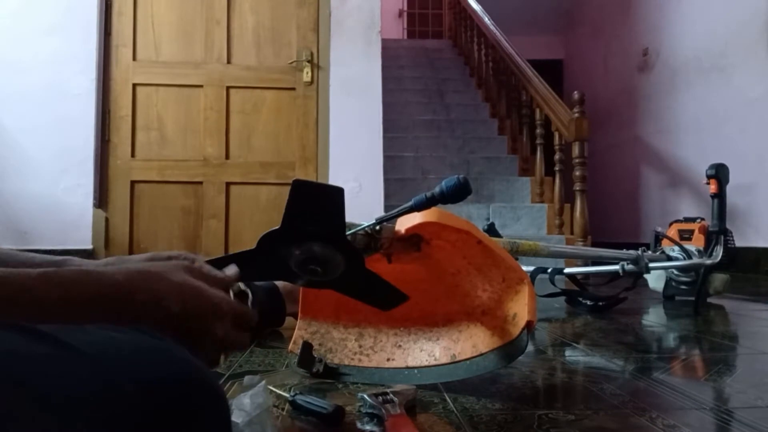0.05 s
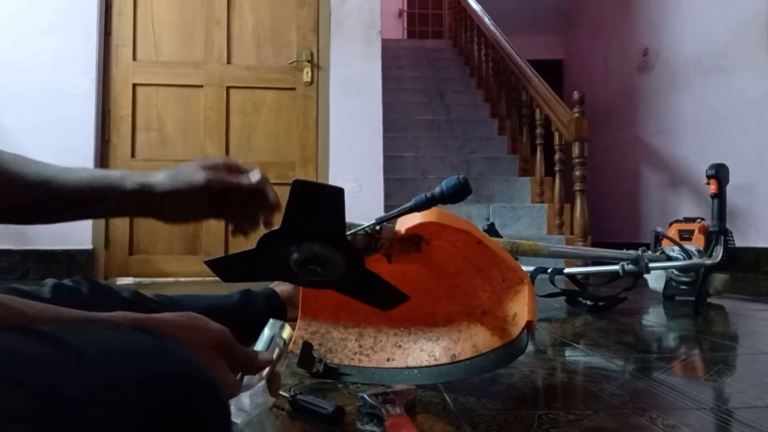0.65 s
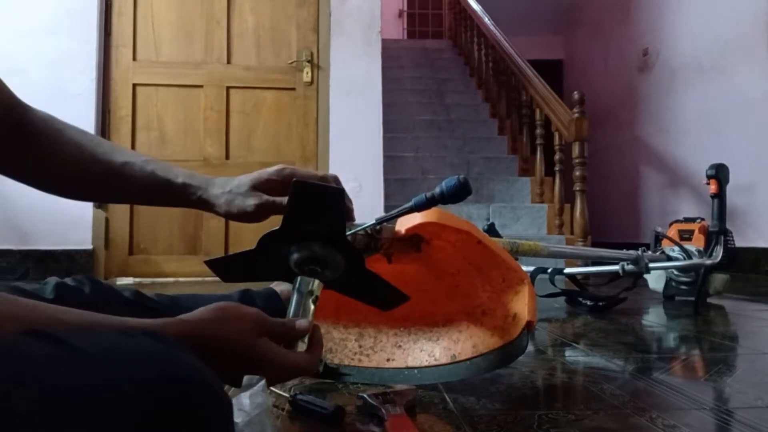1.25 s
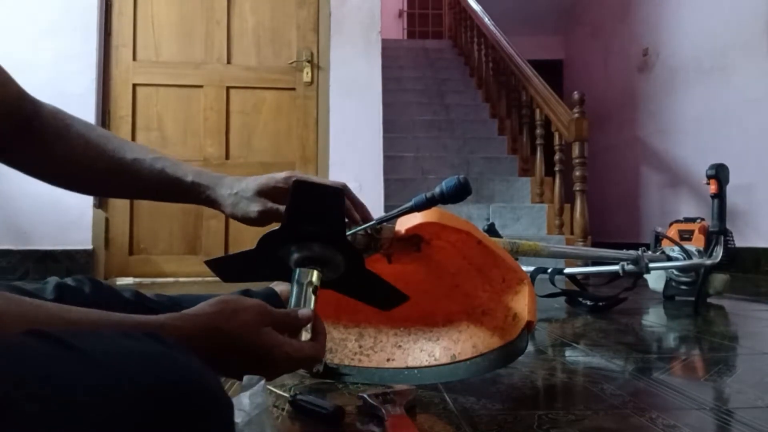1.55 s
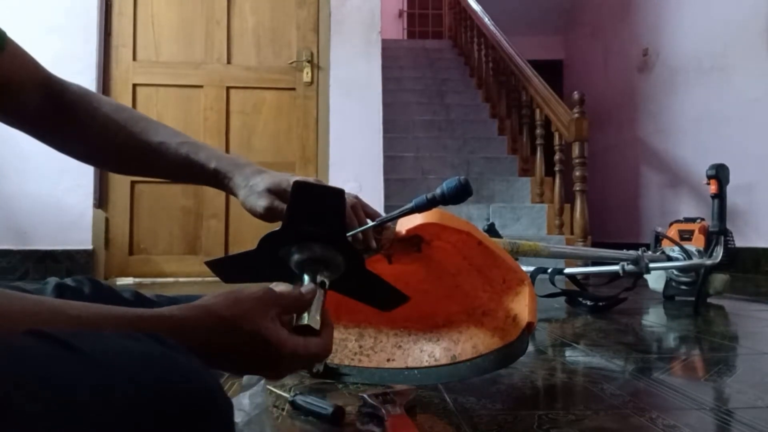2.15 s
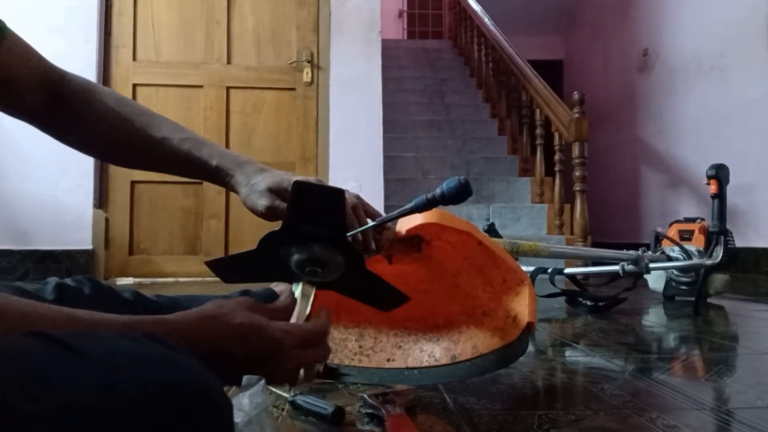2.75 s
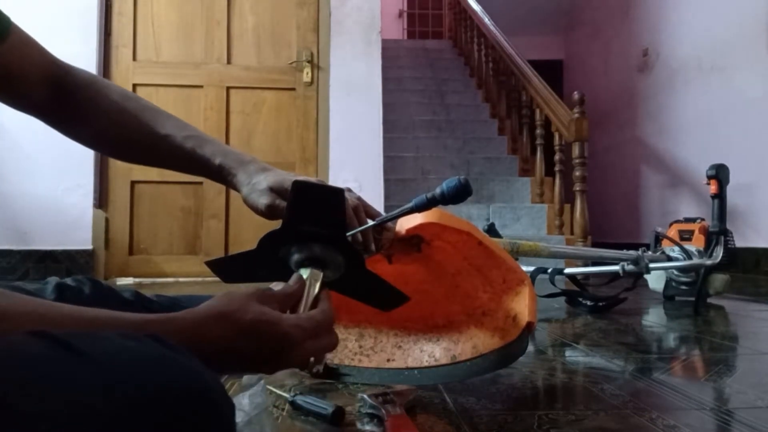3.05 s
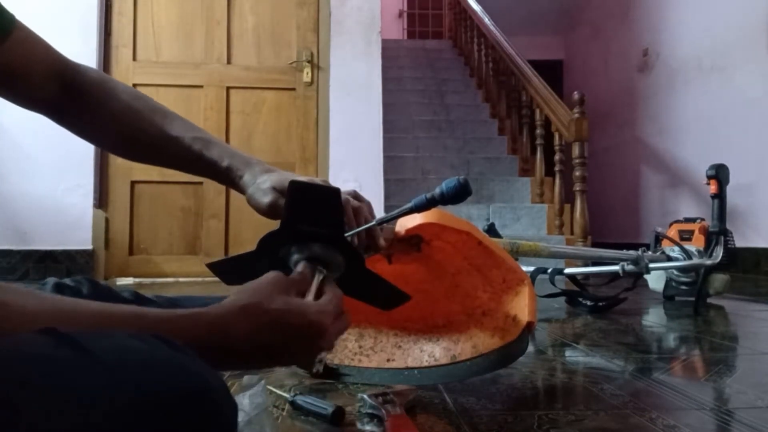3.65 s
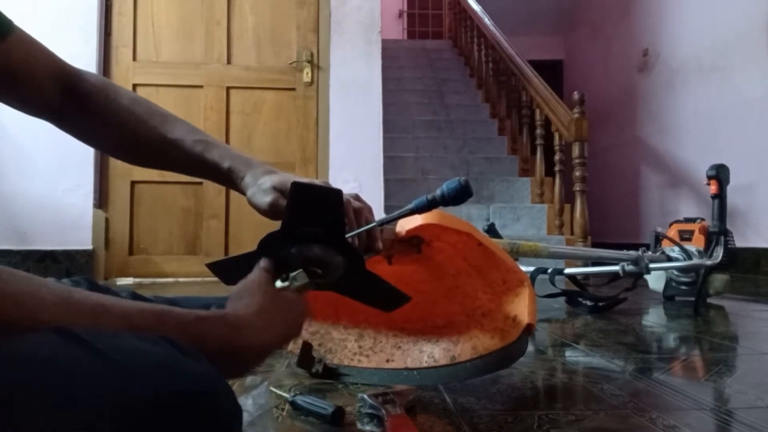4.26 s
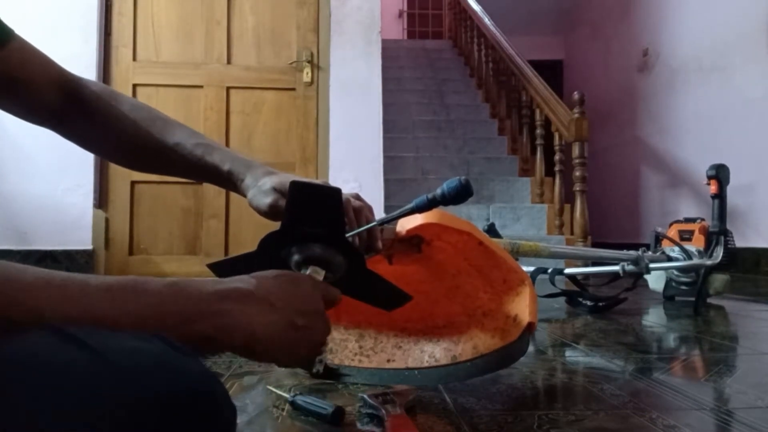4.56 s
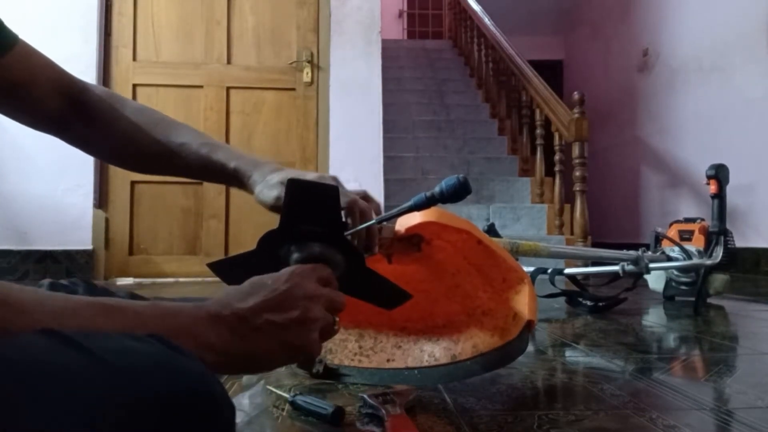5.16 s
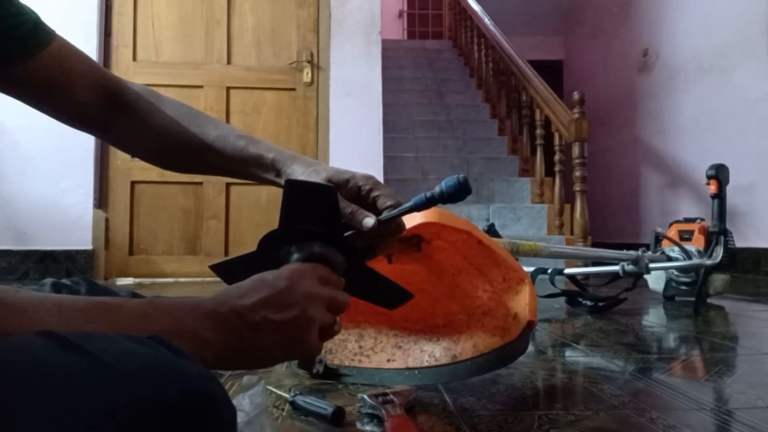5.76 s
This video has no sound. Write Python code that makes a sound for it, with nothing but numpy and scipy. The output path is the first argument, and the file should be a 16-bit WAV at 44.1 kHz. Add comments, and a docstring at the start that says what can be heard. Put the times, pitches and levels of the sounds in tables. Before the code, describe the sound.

A steel box spanner works loose the hub nut of a brush cutter. After a quiet opening, it clinks against the nut in short, irregular clusters. Sharper clanks follow, with the blade and washer ringing briefly, along with low thumps as the machine rocks and a few short, dull rubs of the thread. The strongest clank comes near the end. The sounds are nearby, in an echoing tiled hall with a faint hush and a barely audible cricket.

```python
"""Loosening a brush cutter's hub nut

A steel box spanner works the nut loose. Each impact sets spanner, nut, cup washer or blade ringing in its
natural modes and rattles the gear head and guard. The thread rubs by stick-slip friction, and the machine
rocks with low thumps. A hard tiled hall reverberates; a cricket chirps faintly over a steady hush."""
import sys
import numpy as np
from scipy import signal
from scipy.fft import rfft, irfft, next_fast_len
from scipy.io import wavfile

SR = 44100
rng = np.random.default_rng(int(sys.argv[2]) if len(sys.argv) > 2 else 0)


def transcribe(u):
    """Save the signal u as a 16-bit wav file named by the first command-line argument.

    u: samples, shape (n,) or (channels, n), limited to [-1, 1]; the rate is SR.
    q: integer samples, one column per channel.
    """
    v = np.clip(np.atleast_2d(u).T, -1, 1)
    q = np.round(v * 32767).astype(np.int16)
    wavfile.write(sys.argv[1], SR, q)


N = 256662


def amp(db):
    """Amplitude ratio: tenfold for every 20 dB."""
    return 10 ** (np.asarray(db) / 20)


def unit(x):
    """Normalisation to an rms of 1."""
    return x / np.sqrt(np.mean(x ** 2) + 1e-20)


def along(points, hz):
    """Interpolation of (frequency_hz, value) points on a logarithmic frequency axis."""
    knots_hz, values = np.transpose(points)
    return np.interp(np.log(hz + 1), np.log(knots_hz + 1), values)


def coloured(x, colour_db):
    """Minimum-phase filtering: folding the cepstrum makes the gain curve colour_db(hz) causal."""
    size = 2 * next_fast_len(x.shape[-1] // 2 + 4096)
    gain = amp(colour_db(np.fft.rfftfreq(size, 1 / SR)))
    cepstrum = irfft(np.log(gain), size)
    cepstrum[..., 1:size // 2] *= 2
    cepstrum[..., size // 2 + 1:] = 0
    return irfft(rfft(x, size) * np.exp(rfft(cepstrum)), size)[..., :x.shape[-1]]


def spread(pair, width):
    """Mid-side stereo: two unrelated signals share the power as the (frequency_hz, side_db) points say."""
    def share_db(hz):
        side_db = along(width, hz)
        return np.array([0 * hz, side_db]) - 10 * np.log10(1 + amp(side_db) ** 2)
    mid, side = coloured(pair, share_db)
    return np.array([mid + side, mid - side])


def band(x, lo_hz, hi_hz, order=4):
    """Causal band-pass filtering."""
    return signal.sosfilt(signal.butter(order, [lo_hz, hi_hz], "band", fs=SR, output="sos"), x)


def add(track, x, start_s):
    """Superposition: x is summed into the track from start_s on."""
    span = track[:, round(start_s * SR):][:, :x.shape[1]]
    span += x[:, :span.shape[1]]


# Spectral density of the hush: frequency_hz, relative_db
AIR_SPECTRUM = [(25, -9), (130, 3), (300, -1), (1000, -3), (2000, -1.5), (2700, -6.5), (3500, -14.5),
                (9000, -17.5), (15000, -23)]
# Stereo width of the hush: frequency_hz, side_db
AIR_WIDTH = [(40, -8), (250, -5.5), (1200, 1.5), (8000, 0)]


def air(level_db=-70.5):
    """Stationary noise: the steady hush of the building, strongest in the bass."""
    hush = coloured(rng.standard_normal((2, N)), lambda hz: along(AIR_SPECTRUM, hz))
    return amp(level_db) * unit(spread(hush, AIR_WIDTH))


def cricket(chirps_per_s=8.8, first_s=.06, pitch_hz=7000, width_hz=260, left_db=-84, right_gain_db=-9):
    """Amplitude modulation: distant chirps, smeared by the walls into a narrow pulsing band of noise."""
    t = np.arange(N) / SR
    chirps = 0.29 + np.cos(np.pi * chirps_per_s * (t - first_s)) ** 2
    song = band(rng.standard_normal((2, N)), pitch_hz - width_hz / 2, pitch_hz + width_hz / 2, order=2)
    return amp([[left_db], [left_db + right_gain_db]]) * unit(song * chirps)


def tool_lifted(peak_s=0.21, width_s=0.036, pitch_hz=8030, left_db=-74, right_gain_db=-7):
    """A single mode gives a pure tone: steel sings thinly for a moment as the tool is picked up."""
    t = np.arange(N) / SR
    swell = np.exp(-((t - peak_s) / width_s) ** 2)
    return amp([[left_db], [left_db + right_gain_db]]) * swell * np.sin(2 * np.pi * pitch_hz * t)


# Broad response of the gear head and guard: frequency_hz, gain_db
HEAD_COLOUR = [(105, -1.5), (205, -0.5), (265, 7), (390, 3.5), (660, 7), (940, 3.5), (1140, -7), (1620, 3),
               (2600, 0), (3250, -1.5), (3700, -5.5), (4800, -9.5), (6200, -8.5), (7600, -5), (11300, -12),
               (11850, -21), (13650, -19), (14600, -49.5)]
# Resonances that stand out of it: centre_hz, width_hz, peak_db
HEAD_RESONANCES = [(294, 44, 7.5), (399, 30, 4), (501, 24, 7), (574, 56, 11), (721, 52, 2), (872, 62, 8),
                   (1680, 160, 7), (2218, 60, 2), (2497, 62, 7), (2860, 220, 7), (5695, 95, 7),
                   (5945, 125, 7), (7175, 95, 6), (7430, 125, 6), (8190, 340, 4)]


def head_db(hz):
    """Resonance: the gear head and guard favour the frequencies near their modes."""
    peaks_db = sum(peak_db / (1 + (2 * (hz - centre_hz) / width_hz) ** 2)
                   for centre_hz, width_hz, peak_db in HEAD_RESONANCES)
    return along(HEAD_COLOUR, hz) + peaks_db


def crowded_modes(depth_db=8.0, from_hz=4400):
    """Modal overlap: the head's countless high modes form one curve of narrow peaks and dips."""
    knots_hz = np.linspace(0, SR / 2, 400)
    gains_db = depth_db * np.clip(rng.standard_normal(len(knots_hz)), -2, 2) * (knots_hz > from_hz)
    return lambda hz: np.interp(hz, knots_hz, gains_db)


# Limits of a knock's five bands: edge_hz
BAND_EDGES = [200, 440, 1100, 2200, 3700, 15000]
# Each part's knock at hardness 0: thud_db, body_db, clank_db, clink_db, crack_db
KNOCK_BANDS = {"spanner": (-16.5, -2.5, -7, -1, -13.5), "nut": (-10.5, -1, -3, -1.5, -13.5),
               "washer": (-7.5, -4, 1, -1.5, -7.5), "blade": (-11, -2.5, 0, -4, -7)}


def knock_levels(part, hardness, from_hz=800):
    """Contact time sets bandwidth: a harder, shorter contact puts more level into the treble bands."""
    centres_hz = np.sqrt(np.multiply(BAND_EDGES[:-1], BAND_EDGES[1:]))
    octaves_above = np.log2(np.maximum(centres_hz / from_hz, 1))
    return np.array(KNOCK_BANDS[part]) + hardness * octaves_above


# Stereo width of the direct sound: frequency_hz, side_db
NEAR_WIDTH = [(220, -12), (680, -16), (1400, -7.5), (2650, -8), (4450, -1), (7200, 1.5), (12500, 10.5)]


def rattle(levels_db, crowd_db, crack_t60_s=.022, crack_db=10, body_t60_s=0.15, shake_db=-22):
    """Impulsive excitation of loose fittings: a sharp crack, then the head's crowded, short modes."""
    t = np.arange(SR // 5) / SR
    decay = amp(crack_db - 60 * t / crack_t60_s) + amp(-60 * t / body_t60_s)
    burst = spread(rng.standard_normal((2, len(t))) * decay, NEAR_WIDTH)
    burst = coloured(burst, lambda hz: head_db(hz) + crowd_db(hz))
    chatter = sum(amp(level_db) * unit(band(burst, lo_hz, hi_hz))
                  for level_db, lo_hz, hi_hz in zip(levels_db, BAND_EDGES, BAND_EDGES[1:]))
    shake = amp(levels_db[0] + shake_db) * unit(band(burst, 35, 260, order=2))  # the whole machine jolts
    return chatter + shake


# Natural modes of each steel part: pitch_hz, relative_db, t60_s
SPANNER_MODES = [(1738, -9, .24), (2502, 1, .25), (2693, -4, .25), (2757, -8, .3), (3480, -16, .28),
                 (4631, -20, .33), (5169, -24, .33), (5928, -20, .24), (5997, -24, .3), (7191, -20, .14),
                 (8070, -21, .28), (8356, -23, .24), (9328, -30, .28)]
NUT_MODES = [(500, -8, .24), (1738, -5, .26), (2007, -2, .32), (2499, -6, .29), (2876, -1, .23),
             (3565, -18, .7), (8015, -5, .21), (9395, -20, .22)]
WASHER_MODES = [(1621, 0, .36), (1948, -6, .23), (2694, -4, .4), (2841, 2, .38), (2935, -3, .3),
                (3003, -3, .25), (3297, -5, .25), (3565, -20, .7), (3979, -13, .23), (4112, -10, .3),
                (4625, -8, .36), (5165, -6, .35), (5692, -7, .27), (5924, -10, .31), (6757, -8, .22),
                (7454, -6, .29), (8146, -13, .21)]
BLADE_MODES = [(500, -7, .24), (572, 0, .34), (1569, -3, .41), (1623, -1, .39), (2187, -12, .34),
               (2483, -1, .31), (2671, -10, .36), (3565, -17.5, 1.3), (4629, -17, .34), (5172, -13, .23),
               (5716, -18, .26), (7166, -9, .21), (8146, -17, .24)]
# The parts that can be struck: part, modes
PARTS = {"spanner": SPANNER_MODES, "nut": NUT_MODES, "washer": WASHER_MODES, "blade": BLADE_MODES}


def ring(part, scatter_db=1.5, rise_s=0.00013):
    """Free vibration: a steel part rings as damped sinusoids, weighted anew by each strike point."""
    t = np.arange(SR) / SR
    tone = np.zeros((2, SR))
    for pitch_hz, relative_db, t60_s in PARTS[part]:
        # short waves reach left and right out of step
        skew = np.arctan(amp(along(NEAR_WIDTH, pitch_hz))) * np.array([[1], [-1]])
        decay = amp(relative_db + rng.normal(0, scatter_db) - 60 * t / t60_s)
        tone += decay * np.sin(2 * np.pi * (pitch_hz * t + rng.random()) + skew)
    return tone * (1 - np.exp(-t / rise_s))


# Reverberation time of the hall: frequency_hz, t60_s
HALL_DECAY = [(125, 1.13), (310, 0.94), (610, 1.07), (1650, 0.79), (2850, 0.9648), (4600, 0.65),
              (8100, 0.73), (12500, .46)]
# Strength of the reverberation: frequency_hz, gain_db
HALL_GAIN = [(170, -2), (540, -6.5), (1500, -2.5), (2750, -5.5), (5200, -5.5), (11000, -8.5)]
# Stereo width of the reverberation: frequency_hz, side_db
HALL_WIDTH = [(150, -6), (300, -11.5), (650, -5), (1400, 1), (3000, -1.5), (8000, 0)]


def hall(x, build_s=0.0033):
    """Diffuse reverberation of x's first channel: hard walls absorb little, and the treble dies first."""
    hz, t, noise = signal.stft(rng.standard_normal((2, SR + SR // 2)), SR, nperseg=256)
    t60_s = along(HALL_DECAY, hz)[:, None]
    # the root keeps the tail's energy independent of its decay time
    gain = amp(along(HALL_GAIN, hz))[:, None] * np.sqrt(2 * np.log(1000) / (t60_s * SR))
    envelope = amp(-60 * t / t60_s) * (1 - np.exp(-t / build_s))
    tail = signal.istft(noise * gain * envelope, SR, nperseg=256)[1]
    return signal.fftconvolve(x[:1], spread(tail, HALL_WIDTH), axes=1)


# Steel-on-steel contacts: start_s, part, strength_db, hardness_db_per_octave
BLOWS = [ (1.048, "nut", -106, 10.5), (1.466, "spanner", -53, -0.7), (1.7079, "spanner", -54.5, .7),
         (1.725, "nut", -59.5, 2.5), (1.7618, "spanner", -51.5, 1.86), (1.828, "spanner", -60.5, -11.5),
         (2.011, "nut", -58.5, -8.5), (2.1829, "nut", -67, -1.5), (2.2093, "nut", -58, 1.5),
         (2.965, "spanner", -41.5, -2.6), (2.971, "washer", -54.5, 3.5), (3.154, "spanner", -61.5, -15),
         (3.2751, "nut", -54, -6.5), (3.2846, "blade", -48.5, -0.6), (3.3253, "spanner", -51, -1.1),
         (3.34, "nut", -60.5, -0.5), (3.67, "blade", -69.5, -3.5), (3.6869, "washer", -47.5, 4),
         (3.697, "blade", -49, 2), (4.0939, "blade", -54.5, -7), (4.1886, "nut", -64, -2),
         (4.2971, "spanner", -53, -2.5), (4.3136, "blade", -54, -3), (4.3497, "blade", -58.5, -9),
         (4.3845, "spanner", -54, -1.96), (4.477, "blade", -60.5, -8.5), (4.6518, "nut", -67, -6),
         (4.8195, "blade", -40, 0.35), (4.830, "blade", -51.5, 1.9), (5.2825, "blade", -64, -6.5),
         (5.3288, "blade", -72, -3.5), (5.428, "washer", -87, 5), ]
# How strongly each part rings, relative to the blow: part, gain_db
RING_GAIN = {"spanner": 14, "nut": 10.5, "washer": 4, "blade": 4}
# Balance of the direct sound: frequency_hz, left_minus_right_db
BALANCE = [(2550, -1), (3850, -1.5), (5250, 9.5), (7300, 9), (9400, -4.5), (13500, -5.5)]


def impacts(ring_db_per_hardness=3.2, full_ring_hardness=1.1, ring_to_hall_db=-2.5):
    """Impact excitation: each contact rattles the head, rings one part and sets the hall reverberating."""
    direct, reverberation = np.zeros((2, 2, N))
    crowd_db = crowded_modes()
    for start_s, part, strength_db, hardness in BLOWS:
        knock = amp(strength_db) * rattle(knock_levels(part, hardness), crowd_db)
        # a soft contact damps the part, so it rings more quietly
        ring_db = RING_GAIN[part] + ring_db_per_hardness * min(hardness, full_ring_hardness)
        tone = amp(strength_db + ring_db) * ring(part)
        add(direct, knock, start_s)
        add(direct, tone, start_s)
        radiated = amp(ring_to_hall_db) * tone
        add(radiated, knock, 0)
        add(reverberation, hall(radiated), start_s)
    return coloured(direct, lambda hz: along(BALANCE, hz) * np.array([[.5], [-.5]])) + reverberation


# Turns of the nut on its thread: start_s, hold_s, level_db
TURNS = [(1.653, .1, -59.5), (4.122, 0.07, -57), (4.268, 0.074, -57.5), (4.526, 0.071, -55.5)]


def thread(slips_per_s=260, lo_hz=360, hi_hz=760, rise_db_per_s=387.5, fall_db_per_s=191.5):
    """Stick-slip friction: each slip is a tiny dull knock in the head; a turn swells, holds and fades."""
    t = np.arange(N) / SR
    slips = (rng.random(N) < slips_per_s / SR) * (rng.random(N) - .5)
    envelope = np.zeros((1, N))
    for start_s, hold_s, level_db in TURNS:
        before_s = np.maximum(start_s - t, 0)
        after_s = np.maximum(t - start_s - hold_s, 0)
        envelope += amp(level_db - rise_db_per_s * before_s - fall_db_per_s * after_s)
    rub = envelope * unit(band(coloured(slips, head_db), lo_hz, hi_hz, order=2))
    return rub + hall(rub)[:, :N]


# The machine rocking on its guard: start_s, level_db
THUMPS = [(1.7637, -51.5), (3.3261, -58.5), (3.672, -60.5), (4.82, -51)]


def rocking(t60_s=0.088, lo_hz=220, hi_hz=440):
    """Heavily damped vibration: pushed by the spanner, the machine settles on its guard with a thump."""
    t = np.arange(SR // 5) / SR
    thumps = np.zeros((1, N))
    for start_s, level_db in THUMPS:
        push = rng.standard_normal((1, len(t))) * amp(-60 * t / t60_s)
        thump = band(coloured(push, head_db), lo_hz, hi_hz)
        add(thumps, amp(level_db) * unit(thump), start_s)
    return thumps + hall(thumps)[:, :N]


def scene():
    """Superposition: the work on the hub adds to the quiet of the hall."""
    return impacts() + rocking() + thread() + tool_lifted() + cricket() + air()


def record(dry, top_hz=15300):
    """Band limiting: an ideal low-pass removes everything above top_hz."""
    size = next_fast_len(N + SR // 2)
    passband = np.fft.rfftfreq(size, 1 / SR) < top_hz
    return irfft(rfft(dry, size) * passband, size)[:, :N]


dry = scene()
out = record(dry)
transcribe(out)
```